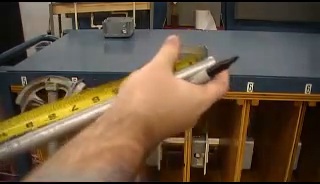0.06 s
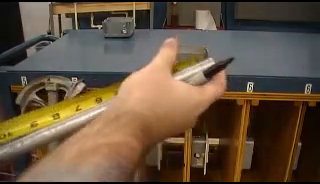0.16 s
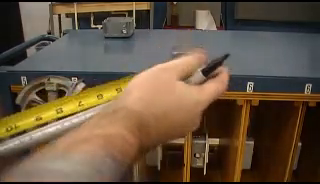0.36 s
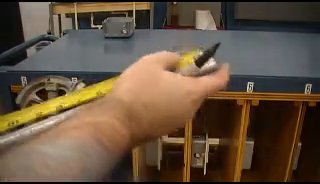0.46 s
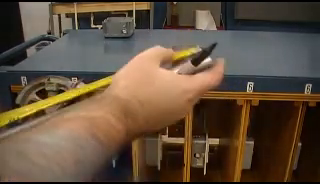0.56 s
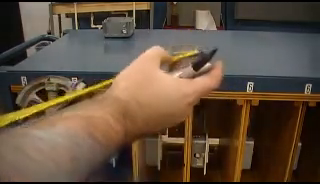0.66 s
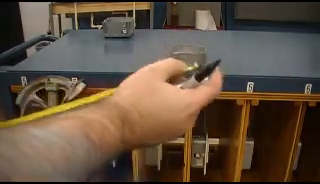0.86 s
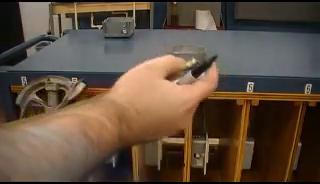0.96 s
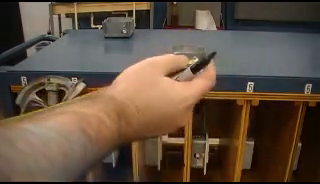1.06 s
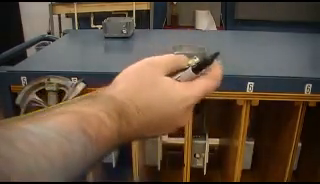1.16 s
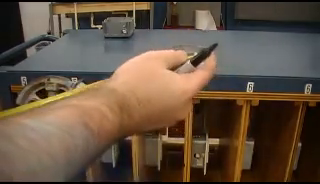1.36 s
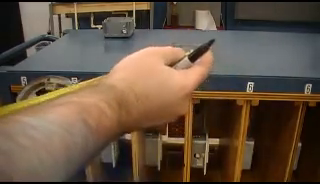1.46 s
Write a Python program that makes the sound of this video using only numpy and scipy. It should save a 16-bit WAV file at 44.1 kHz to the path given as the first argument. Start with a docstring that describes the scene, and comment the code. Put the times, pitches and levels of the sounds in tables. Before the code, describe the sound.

Sharp clacks and light scraping of a metal tape measure sliding along a hand-held pipe.

```python
"""In a workshop, close by, a steel tape measure is slid along a metal pipe and hooked over its end.
Impacts make the thin blade rattle and clack, the hook ping and the hand-damped pipe ring briefly
in its modes. Sliding friction makes a scrape with a faint, sinking tone.
A fan hums behind it all, and the room adds a short reverberation."""
import sys
import numpy as np
from scipy import signal
from scipy.fft import rfft, irfft
from scipy.io import wavfile
from scipy.ndimage import uniform_filter1d

SR = 44100
rng = np.random.default_rng(int(sys.argv[2]) if len(sys.argv) > 2 else 0)


def digitize_waveform(pressure):
    """Quantize a signal to 16-bit integers and store it at the path in sys.argv[1].

    Rows of a 2-D input are taken as channels; values are limited to [-1, 1].
    """
    field = np.atleast_2d(pressure).T
    bounded = np.clip(field, -1, 1)
    quanta = np.round(bounded * 32767).astype(np.int16)
    wavfile.write(sys.argv[1], SR, quanta)


N = 66150

# Knocks of blade and hook. Each row: start in seconds, energy in dB, rattle time constant in seconds,
# tilt in dB per octave, clack gain in dB, share of the energy in the first contact.
BLADE_KNOCKS = [(0.095, -27, 0.002, 6, -45, 0.1), (0.2026, -8, 0.0013, -1, -4, 0),
                (0.2049, -2, 0.0017, 1, -15, 0), (0.2072, 9.5, 0.0028, 0, -14, 0.034),
                (0.211, 12, 0.0059, 2.5, -5, 0.028), (0.221, 8, 0.00059, 9, -5.5, 0.64),
                (0.2226, 10, 0.0017, 5, 2.5, 0), (0.23, -9, 0.0029, -10, -7, .1),
                (0.3385, -5.5, 0.003, 0, -45, 0.12), (0.3422, 1, 0.0026, -2.5, 5.5, 0.11),
                (.3435, 5.5, 0.0038, 1, -2, 0.43), (.392, -17, 0.0018, -3, -48, 0.32),
                (.523, -20.5, 0.0067, -7, -19, 0.38), (0.532, -18, 0.009, -7, -21.5, 0),
                (0.559, -15.5, 0.0036, -6.5, -48, 0.23), (0.591, -3.5, 0.01, 3, -28, 0.1),
                (0.5955, 5.5, 0.0022, -1.5, -14, 0.41), (0.5968, 1, 0.00052, -1.5, -30, 0),
                (0.618, 0, 0.012, 3, -19, 0), (0.63, 3, 0.012, 3, -21, 0.18),
                (0.645, -4, 0.0028, -1.5, -15.5, 0.31), (0.939, -13, 0.02, -5, -19.5, 0),
                (1.119, -17, 0.0045, -4, -8.5, 0), (1.148, -16.5, 0.0072, -5.5, -32, 0.36),
                (1.1522, -4, 0.0067, 9, -13.5, 0.029), (1.169, -14, 0.036, -4.5, -22, 0.16),
                (1.3312, -13, 0.019, -1.5, -22, 0.22), (1.384, -21.5, 0.011, -12.5, -30, 0)]
# Spectrum of a blade contact. Each row: frequency in Hz, relative level in dB.
BLADE_SPECTRUM = [(100, -29), (400, -26), (900, -5), (1600, -2), (3000, 1), (5000, 5), (6500, 4),
                  (8000, 9.5), (9500, 4), (11000, 0), (13000, -16)]
# Hollow modes of the curved blade. Each row: frequency in Hz, relative level in dB, T60 in seconds.
CLACK_MODES = [(1894, -4.5, 0.02), (2133, 1.5, 0.022), (2433, 4.5, 0.02), (2557, 2, 0.017),
               (2862, -2.5, 0.029)]
def blade_knocks():
    """Impact excitation: a hard contact, a dense rattle, and a clack whose modes shift with flexing."""
    out, t = np.zeros(N), np.arange(SR // 10) / SR
    # The clack keeps to the range above about 1.5 kHz.
    low_cut = signal.butter(N=3, Wn=1550, btype="high", fs=SR, output="sos")
    for start, db, decay, tilt, clack_db, share in BLADE_KNOCKS:
        contact = click(BLADE_SPECTRUM, tilt)
        chatter = rng.standard_normal(len(t)) * np.exp(-t / decay)
        rattle = unit(signal.fftconvolve(chatter, contact))
        clack = signal.sosfilt(low_cut, ring(CLACK_MODES, spread=0.024))
        add(out, start, amp(db) * np.sqrt(share) * contact)
        add(out, start, amp(db) * np.sqrt(1 - share) * rattle)
        add(out, start, amp(clack_db) * clack)
    return out


# Pings of hook and blade tip. Each row: start in seconds, energy in dB, pitch in Hz, T60 in seconds.
HOOK_PINGS = [(.2209, 5, 7970, 0.0013), (0.3446, -3.5, 8550, 0.0046), (0.5892, -2.5, 10000, 0.015),
              (.596, 5.5, 9580, 0.025), (0.604, -6, 9620, 0.041), (0.647, -9, 9500, 0.082),
              (0.68, -5.5, 9570, 0.052), (.691, -12, 9650, 0.033), (.9267, 4.5, 9604, 0.034),
              (1.1185, -8, 7980, 0.002), (1.152, -10.5, 7920, 0.022), (1.15, -10, 9970, 0.12),
              (1.3309, -8.5, 9880, 0.063), (1.3312, -16.5, 5040, 0.042)]
def hook_pings(waver_hz=114, chatter_s=0.0026, buzz_db=-20, buzz_times_longer=5.5):
    """Modulation: the loose hook chatters, so each ping flutters in pitch and breaks into a buzz."""
    out, t = np.zeros(N), np.arange(SR // 2) / SR
    for start, db, hz, t60 in HOOK_PINGS:
        pitch = hz + waver_hz * flutter(chatter_s, len(t))
        tone = np.sin(2 * np.pi * np.cumsum(pitch) / SR)
        log_decay = -np.log(1000) * t / t60
        buzz = amp(buzz_db) * flutter(chatter_s, len(t)) * np.exp(log_decay / buzz_times_longer)
        add(out, start, amp(db) * unit(tone * (np.exp(log_decay) + buzz)))
    return out


# Blows on the pipe. Each row: start in seconds, energy in dB, tilt in dB per octave.
PIPE_BLOWS = [(.096, -24.5, 15), (.212, -1, -4.5), (.596, -1.5, 6.5), (.646, -7.5, 1), (.675, -7, 1.5),
              (.9267, -8, 7.5), (1.153, -15.5, -0.5), (1.3312, -11, -1.5)]
# Modes of the pipe. Each row: frequency in Hz, relative level in dB, T60 in seconds.
PIPE_MODES = [(1504, -5.5, 0.079), (2548, -6, 0.088), (3590, -1, 0.053), (3830, 1, 0.035),
              (4884, -2.5, 0.063), (5020, 2, 0.025), (6330, -1.5, 0.047), (8440, -4, 0.047),
              (10050, -4, 0.031), (11800, -12.5, 0.06)]
def pipe_rings():
    """Damped free vibration: each blow excites the pipe's modes, and the hand soon absorbs them."""
    out = np.zeros(N)
    for start, db, tilt in PIPE_BLOWS:
        add(out, start, amp(db) * ring(PIPE_MODES, tilt))
    return out


# Dull pushes on the hand. Each row: start in seconds, energy in dB, time constant in seconds.
HAND_THUMPS = [(.211, -4.5, 0.00025), (.5959, -8.5, 0.00021), (0.5961, -15, 0.0027)]
def hand_thumps():
    """Critical damping: each push gives one pulse and a shallow undershoot, with no ringing."""
    out, t = np.zeros(N), np.arange(SR // 10) / SR
    for start, db, decay in HAND_THUMPS:
        add(out, start, amp(db) * unit((1 - t / decay) * np.exp(-t / decay)))
    return out


# Dull knocks within the hand-held bundle. Each row: start in seconds, energy in dB.
BUNDLE_BUMPS = [(.2046, -8.5), (.211, -3.5), (0.2151, -4.5), (.523, -16.5), (0.533, -21), (.596, -17),
                (1.153, -18)]
# Modes of the bundle. Each row: frequency in Hz, relative level in dB, T60 in seconds.
BUNDLE_MODES = [(430, -20, 0.0075), (820, 0.5, 0.014), (1090, -7.5, 0.0067), (1440, 0, 0.014),
                (1776, 2.5, 0.039)]
def bundle_bumps():
    """Damped resonance: pipe, marker and blade knock together, and the grip shifts their modes."""
    out = np.zeros(N)
    for start, db in BUNDLE_BUMPS:
        add(out, start, amp(db) * ring(BUNDLE_MODES, spread=0.038))
    return out


# Strength of the sliding. Each row: time in seconds, level in dB.
SLIDE_LEVEL = [(0, -54.5), (.08, -67), (.13, -62), (0.161, -46), (0.174, -34), (.19, -44.5), (0.201, -37.5),
               (.24, -42.5), (.335, -43), (.37, -83), (.51, -55.5), (.585, -53), (.62, -44), (0.659, -38),
               (.72, -43.5), (.8, -51), (.845, -45), (0.922, -43.5), (0.971, -52.5), (1.5, -92)]
# Spectrum of one slip. Each row: frequency in Hz, relative level in dB.
SLIP_SPECTRUM = [(200, -21.5), (700, -6), (1300, -6.5), (1700, 1), (2900, 3), (4000, 0.5), (6000, -2.5),
                 (8500, -2.5), (11000, -7.5), (12500, -34)]
def blade_slide(slips_per_s=9000, slip_spread_db=0.5, pipe_db=-9):
    """Stick-slip friction: tiny random slips of the blade make a scrape and weakly drive the pipe."""
    slips = rng.standard_normal(N) * (rng.random(N) < slips_per_s / SR)
    slips *= amp(-slip_spread_db * np.minimum(rng.exponential(1, N), np.pi))
    level_db = np.interp(np.arange(N) / SR, *np.transpose(SLIDE_LEVEL))
    drive = unit(slips) * np.sqrt(N) * amp(level_db)
    scrape = signal.fftconvolve(drive, click(SLIP_SPECTRUM))[:N]
    singing = signal.fftconvolve(drive, ring(PIPE_MODES))[:N]
    return scrape + amp(pipe_db) * singing


# Tone of the scraping blade. Each row: time in seconds, pitch in Hz, level in dB.
SCRAPE_GLIDE = [(0.802, 1850, -89), (.875, 1746, -54.5), (0.939, 1713, -53), (1.05, 1685, -66)]
def scrape_tone(flutter_s=0.0067):
    """Narrow-band noise: a faint, rough tone that sinks as the blade slides along."""
    t = np.arange(N) / SR
    times, pitches, levels = np.transpose(SCRAPE_GLIDE)
    carrier = np.exp(2j * np.pi * np.cumsum(np.interp(t, times, pitches)) / SR)
    wobble = flutter(flutter_s, N) + 1j * flutter(flutter_s, N)
    return amp(np.interp(t, times, levels)) * (wobble * carrier).real


# Rush of fan and room air. Each row: frequency in Hz, relative spectral density in dB.
AIR_SPECTRUM = [(20, -7), (45, -3), (110, 2.5), (180, 1), (280, -0.5), (420, -4), (700, -9), (1200, -14),
                (2500, -19), (5000, -27), (10600, -26), (12000, -71)]
# Hum of the fan. Each row: frequency in Hz, level in dB.
HUM_TONES = [(113, -86), (253, -60), (479, -64)]
def fan(air_db=-48.5, waver_hz=2.596, waver_s=0.12):
    """Broadband plus tonal noise: a low rush of air under a few wavering hum lines."""
    out = amp(air_db) * np.sqrt(N) * unit(shaped(rng.standard_normal(N), AIR_SPECTRUM))
    for hz, db in HUM_TONES:
        pitch = hz + waver_hz * flutter(waver_s, N)
        cycles = np.cumsum(pitch) / SR + rng.random()
        out += amp(db) * np.sqrt(2) * np.sin(2 * np.pi * cycles)
    return out


# Reverberation time of the workshop. Each row: frequency in Hz, T60 in seconds.
TAIL_T60 = [(200, 0.057), (1000, 0.23), (3000, 0.52), (7000, 0.44), (12000, 0.4)]
# Colour of the reverberant tail. Each row: frequency in Hz, relative gain in dB.
TAIL_COLOUR = [(100, -23), (500, 16.5), (2500, 1), (7000, 4.5), (11000, -5.5), (12500, -2)]
def workshop_echoes(x, early_db=-8.5, early_decay_s=0.01, tail_db=-16, tail_rise_s=0.0064):
    """Reverberation: early reflections off the bench and hands, then a diffuse exponential tail."""
    t = np.arange(N) / SR
    hz, frame_s, spectra = signal.stft(rng.standard_normal(N), SR, nperseg=256)
    decay = np.exp(-np.log(1000) * frame_s / read(TAIL_T60, hz)[:, None])
    tail = signal.istft(spectra * decay, SR)[1][:N]
    tail = shaped(tail * np.minimum(t / tail_rise_s, 1), TAIL_COLOUR)
    reflections = rng.standard_normal(N) * (rng.random(N) < 0.08)
    early = reflections * np.exp(-t / early_decay_s) * (t > 0.002)
    response = amp(tail_db) * unit(tail) + amp(early_db) * unit(early)
    return signal.fftconvolve(x, response)[:N]


def ring(modes, tilt=0, spread=0):
    """Modal superposition: decaying sines, each detuned at random by up to the fraction `spread`."""
    t = np.arange(SR // 2) / SR
    out = np.zeros(len(t))
    for hz, db, t60 in modes:
        pitch = hz * (1 + spread * rng.uniform(-1, 1))
        gain = rng.choice([-1, 1]) * amp(db + tilt * np.log2(hz))
        out += gain * np.exp(-np.log(1000) * t / t60) * np.sin(2 * np.pi * pitch * t)
    return unit(out)


def click(spectrum, tilt=0, size=1024):
    """Minimum-phase impulse with a given spectrum, tilted in dB per octave from 2 to 10 kHz."""
    hz = abs(np.fft.fftfreq(size, 1 / SR))
    log_gain = np.log(amp(read(spectrum, hz) + tilt * np.log2(np.clip(hz, 2000, 10000))))
    response = np.exp(np.conj(signal.hilbert(log_gain)))
    return unit(np.fft.ifft(response).real[:size // 2])


def flutter(seconds, size):
    """Moving average of noise: a random wobble with an rms of one."""
    return np.sqrt(size) * unit(uniform_filter1d(rng.standard_normal(size), max(round(seconds * SR), 1)))


def shaped(x, points, scale=1):
    """Zero-phase filtering by a dB table multiplied by `scale`."""
    return irfft(rfft(x) * amp(scale * read(points, np.fft.rfftfreq(N, 1 / SR))), N)


def read(points, hz):
    """Interpolation of a table on a log-frequency axis."""
    frequencies, values = np.transpose(points)
    return np.interp(np.log(hz + 1), np.log(frequencies + 1), values)


def add(mix, start, sound):
    """Superposition of a sound on the mix from `start` seconds."""
    part = mix[max(round(start * SR), 0):][:len(sound)]
    part += sound[:len(part)]


def amp(db):
    """Decibels to amplitude ratio."""
    return 10 ** (np.asarray(db) / 20)


def unit(x):
    """Normalisation to an energy of one."""
    return x / np.sqrt(np.sum(x ** 2) + 1e-20)


# Stereo width. Each row: frequency in Hz, gain of the side signal in dB.
SIDE_GAIN = [(50, -12.5), (200, -11), (700, -2.5), (2300, -6.5), (3600, -3), (4600, -46), (12000, -43)]
# Lean to the left. Each row: frequency in Hz, gain in dB before each channel's own scale factor.
LEFT_LEAN = [(50, -1.6), (400, -0.72), (1400, 0.41), (2800, 1), (4500, 0)]
def scene():
    """Mid-side stereo: tape and pipe lie near the centre; decorrelated room and fan spread around."""
    near = blade_knocks() + hand_thumps() + bundle_bumps() + pipe_rings() + hook_pings()
    near += blade_slide() + scrape_tone()
    mid = near + workshop_echoes(near) + fan()
    side = shaped(workshop_echoes(near) + fan(), SIDE_GAIN)
    left = shaped(mid + side, LEFT_LEAN, scale=0.33)
    right = shaped(mid - side, LEFT_LEAN, scale=-1.5)
    return np.array([left, right])


def record(dry, threshold_db=-25.5, ratio=2, attack_s=0.004, recovery_db_per_s=32, cutoff_hz=13100):
    """Dynamic compression: the gain dips after loud knocks and recovers; a low-pass limits the band."""
    pole = np.exp(-1 / (attack_s * SR))
    power = signal.lfilter([1 - pole], [1, -pole], (dry ** 2).mean(0))
    excess_db = np.maximum(10 * np.log10(power + 1e-12) - threshold_db, 0)
    recovery_db = np.arange(N) * recovery_db_per_s / SR
    dip_db = np.maximum.accumulate((1 - 1 / ratio) * excess_db + recovery_db) - recovery_db
    compressed = dry / amp(signal.lfilter([1 - pole], [1, -pole], dip_db))
    low_pass = signal.firwin(161, cutoff_hz, window=("kaiser", 8), fs=SR)
    return signal.oaconvolve(compressed, low_pass[None], "same")


dry = scene()
out = record(dry)
digitize_waveform(out)
```